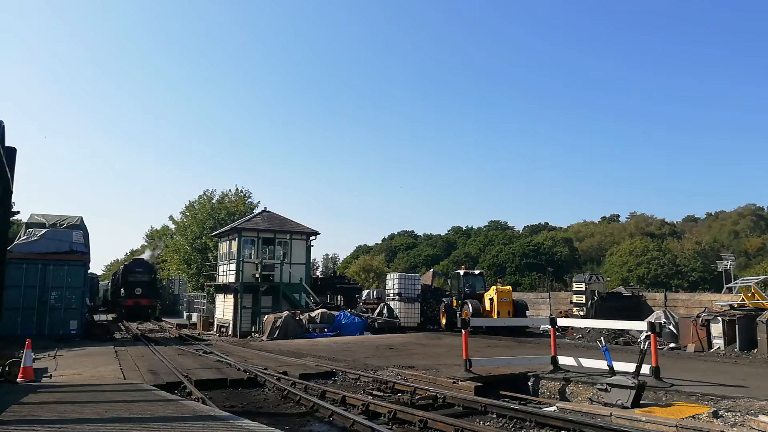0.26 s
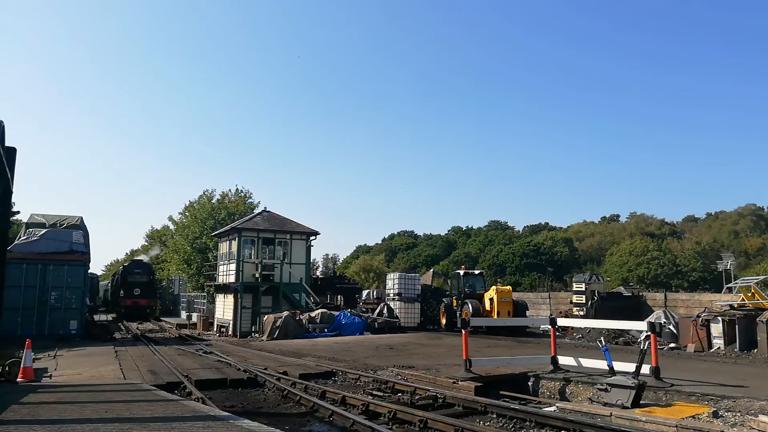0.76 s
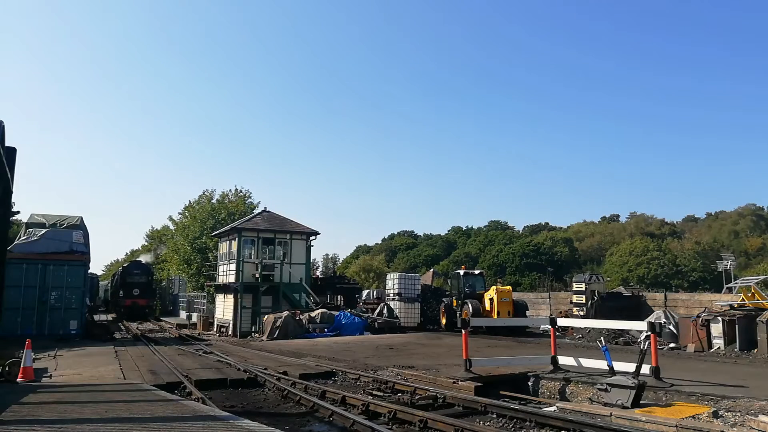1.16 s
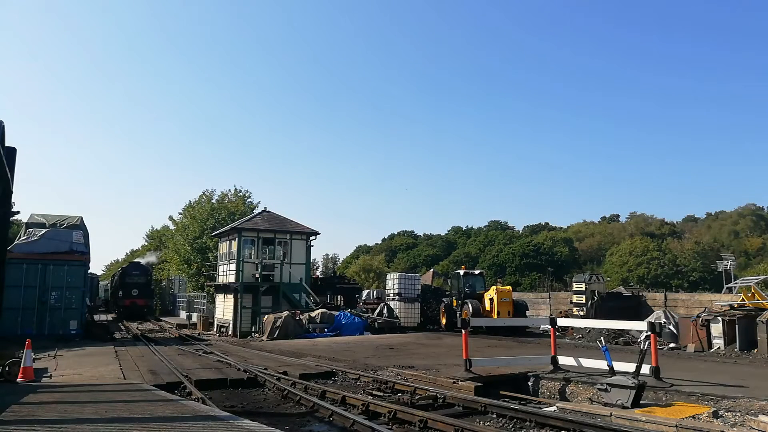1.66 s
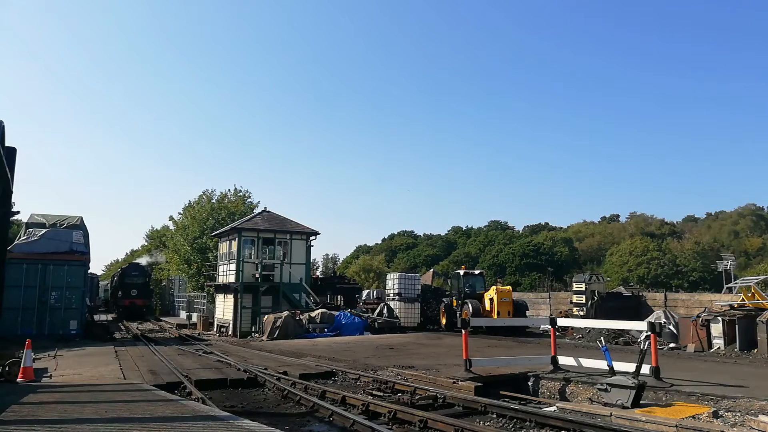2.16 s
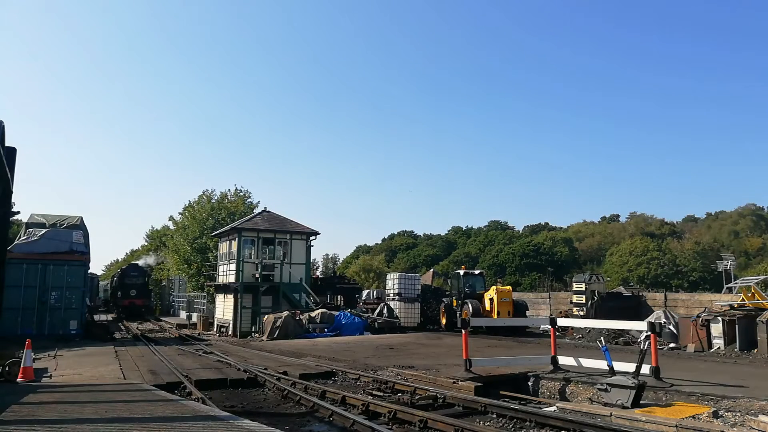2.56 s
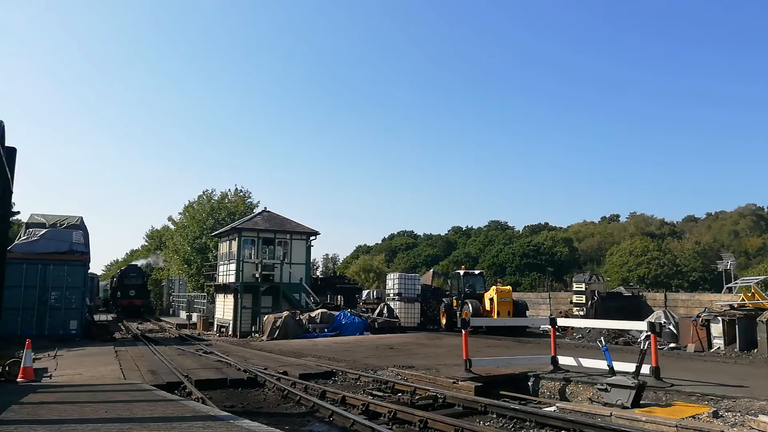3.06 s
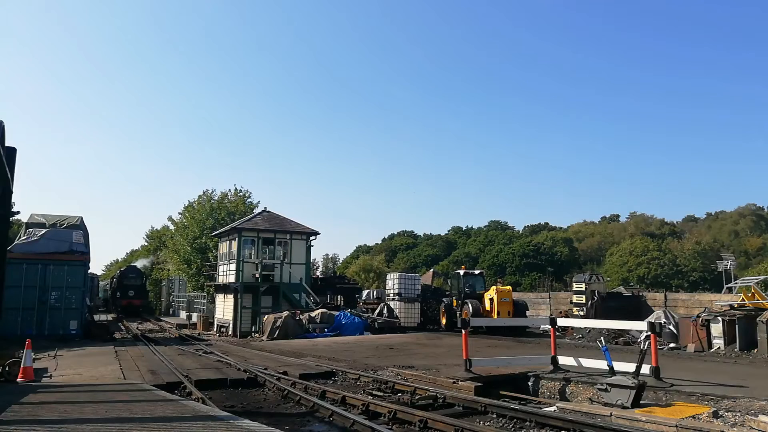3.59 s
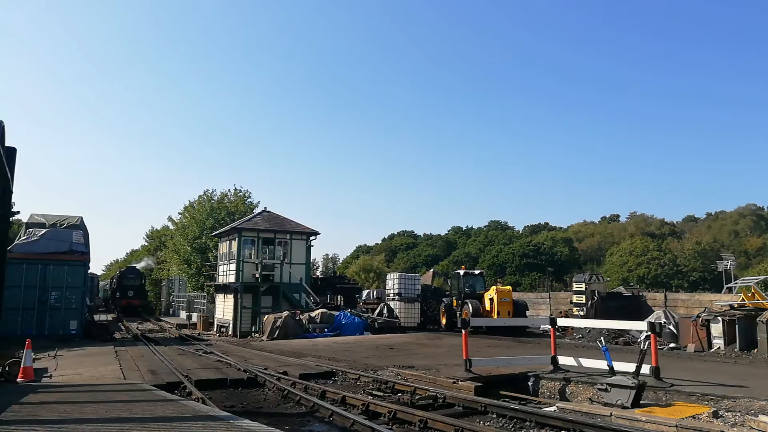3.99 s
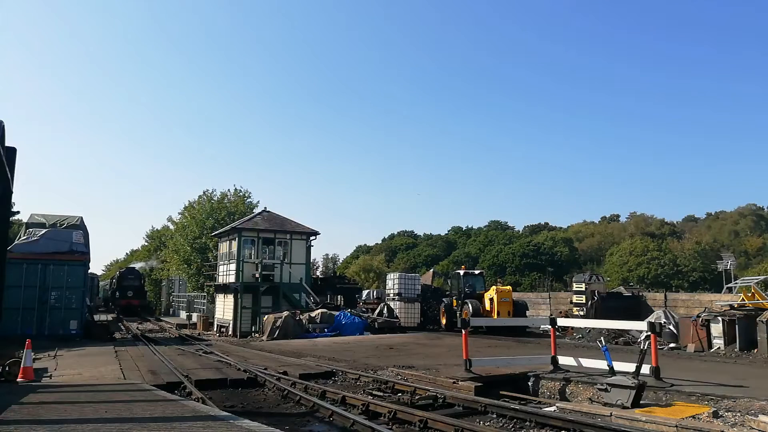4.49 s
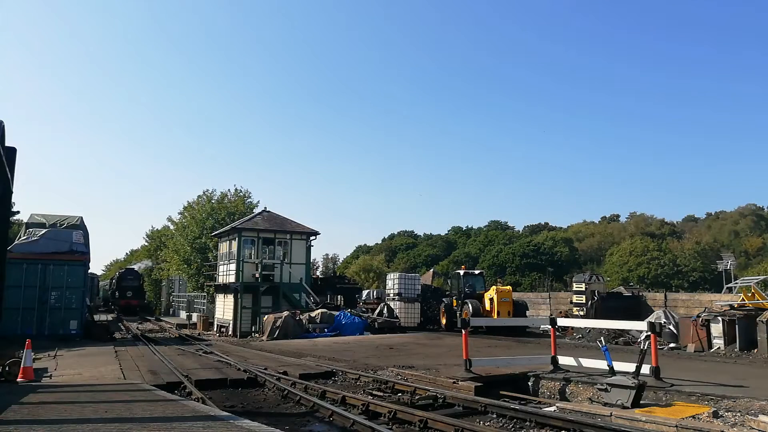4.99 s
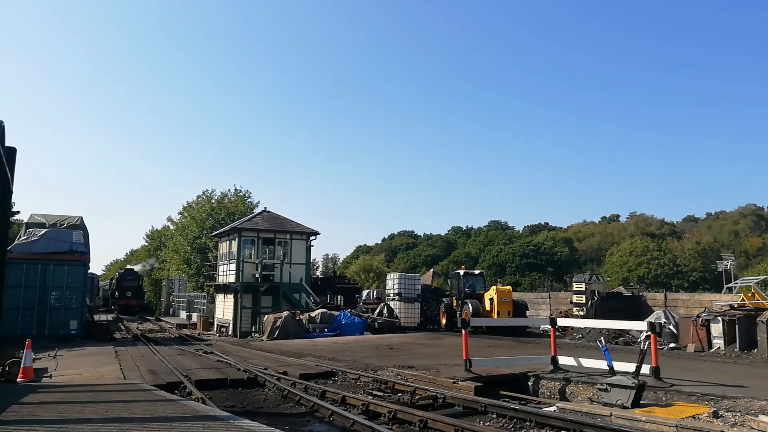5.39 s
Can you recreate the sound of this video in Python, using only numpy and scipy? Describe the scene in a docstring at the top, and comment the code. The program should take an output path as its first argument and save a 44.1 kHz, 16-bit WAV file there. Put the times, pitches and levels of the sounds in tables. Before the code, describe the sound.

Stereo outdoor pickup: steam swells and ebbs in five slow blasts, bright and airy, with a constant faint leak between them. Close to the right, a dry metal linkage scrapes over catches, ticks, clacks home and rebounds with tiny squeaks, five times. The second and fourth blasts squeal with breathy high tones. A low engine roar fades slightly as the locomotive departs, with a few soft wind bumps.

```python
"""An open yard: a steam locomotive draws slowly away, left of the listening point.
Shaped noise swells as steam from its cylinder cocks: a soft chuff, a jet and a thinner hiss;
it sputters most in the first blast, and wavering edge tones whistle in the two hardest.
Close on the right a metal linkage drags, clacks and squeaks: noise bursts, decaying modes and gliding tones.
Under it all lie low noise and a drone for the engine, and a little wind."""
import sys
import numpy as np
from scipy import signal
from scipy.fft import rfft, irfft
from scipy.io import wavfile
from scipy.ndimage import uniform_filter1d

SR = 44100
rng = np.random.default_rng(int(sys.argv[2]) if len(sys.argv) > 2 else 0)


def generate_wav(signal):
    """Clip the signal to [-1, 1] and save it as 16-bit WAV at the path in sys.argv[1]."""
    frames = np.transpose(np.atleast_2d(signal))
    scaled = np.clip(frames, -1, 1) * 32767
    pcm = np.round(scaled).astype(np.int16)
    wavfile.write(sys.argv[1], SR, pcm)


N = 248724
T = np.arange(N) / SR  # time [s]
HZ = np.fft.rfftfreq(N, 1 / SR)  # frequency axis [Hz]

# Relative power spectra of the sources: f/Hz, level/dB (per Hz)
RUMBLE_SPECTRUM = [(15, -2), (30, -8.5), (50, -2), (75, 0.5), (100, -2), (130, -4.5), (190, -7.5),
                   (300, -14), (400, -17), (500, -24.5), (900, -23), (2000, -77), (6000, -62), (15000, -45)]
THUD_SPECTRUM = [(80, -27), (200, 3), (320, 4), (450, -4), (700, -9), (1500, -22), (5000, -50)]
CHUFF_SPECTRUM = [(400, -15), (700, -5.5), (950, 5.5), (1250, 3), (1600, -0.5), (1950, 4), (2300, 4.5),
                  (3000, 1), (5000, -35)]
JET_SPECTRUM = [(500, -15), (1200, 4), (2700, 2), (3500, 2), (4500, 8), (5800, 3.5), (6600, 6.5),
                (8200, 6.5), (9600, 5), (10700, 1.5), (11700, -6), (13000, -9), (14200, -15), (16000, -88)]
THIN_HISS_SPECTRUM = [(1900, -23.5), (2500, -15.5), (3200, -5), (3700, -3.5), (4200, 0.5), (4650, -0.5),
                      (5100, -5.5), (5600, -7.5), (7000, -13.5), (9500, -36), (12000, -60)]
DRAG_SPECTRUM = [(600, -52), (1600, 1.5), (2450, -2), (2900, 9.5), (3250, -2), (3600, 5.5), (4400, 9),
                 (5800, 4.5), (7100, 7.5), (8200, -1.5), (10000, 10), (12500, -7), (15500, -14)]
CLACK_SPECTRUM = [(500, -7.5), (1400, -6.5), (2400, 0.5), (3100, 8), (3500, 0), (4250, 9.5), (5200, 3.5),
                  (6800, 1), (8200, 6), (9400, 11.5), (10800, 7), (12500, -3.5), (15500, -22)]
BED_SPECTRUM = [(150, -32), (330, -11), (480, -10.5), (640, 5), (850, -13), (1400, 1), (3000, -25)]
PUFF_SPECTRUM = [(70, -19), (140, -2), (200, -1.5), (280, -12), (420, -14.5), (1000, -48)]
# Rush of steam just under the highest edge tone: f/Hz, level/dB (per Hz)
RUSH_SPECTRUM = [(10000, -42), (11400, 9), (12300, 0), (13000, 9), (13550, -16), (14500, -53)]

# Likeness of the rumble at the two ports: f/Hz, likeness (0 to 1)
RUMBLE_LIKENESS = [(30, .96), (100, .97), (160, .92), (250, .7), (600, .3), (2000, .2)]
# Likeness of the steam at the two ports, limited to 0..1 in use: f/Hz, likeness
STEAM_LIKENESS = [(300, 0.3), (550, 0.3), (1000, 0.88), (1400, 0.46), (1750, 0.1), (2050, 0.62),
                  (2250, 0.65), (2700, 0.82), (3600, 0), (4500, 1.23), (5600, 0.33), (7000, 0.5),
                  (8600, 0.56), (10200, 0.05), (11500, 0.2)]
# Balance of the steam: f/Hz, left minus right level/dB
STEAM_BALANCE = [(500, -3.5), (950, 5), (1400, -2), (1750, -3.5), (2250, 2.5), (3250, 0), (3700, 4.5),
                 (4550, 2), (5000, -5.5), (5900, 0.5), (7000, 1.5), (9000, 0.5), (10600, 6.5), (12000, 4),
                 (15000, 2)]
# Phase turned by reflections: f/Hz, phase/rad by which the left port leads beyond LEAD_MS
PHASE_TURN = [(300, 0.48), (600, 2.2), (1000, 0.65), (1550, -1.02), (2000, 1.05), (2300, -0.099),
              (6300, -0.64), (7000, -0.33), (8500, -1), (10500, -0.41)]
# Depth scale of the slow random unevenness of the steam's spectrum: f/Hz, level/dB
UNEVEN_DEPTH = [(500, 2.2), (2500, 2.7), (5000, 1.9), (12000, 1.8)]

# Level of the engine's low drone: t/s, level/dB
DRONE_LEVEL = [(0, -48), (.7, -52), (1.5, -54.5), (2.1, -59), (2.9, -54), (3.7, -52), (4.3, -51.5),
               (5.63, -50.5)]
# Gusts on the microphone: t/s of the peak, half length/s, level/dB
GUSTS = [(1.348, 0.069, -35.5), (2.834, 0.016, -41), (4.376, 0.032, -46)]
# Soft low bumps: t/s, level/dB, length/s
BUMPS = [(4.812, -51.5, 0.028)]

# Blasts of the cylinder cocks, one per piston stroke: t/s at full pressure, half length/s,
# build/s, ebb/s, then level/dB of chuff, jet, thin hiss, jet's bright hump, low puff
BLASTS = [(0.553, 0.17, 0.25, 0.15, -42.5, -46, -39.5, 14, -54),
          (1.745, 0.16, 0.35, 0.16, -47, -35, -40, 8.5, -78),
          (2.988, 0.16, 0.21, 0.18, -47.5, -40.5, -42.5, 2, -52),
          (4.093, 0.15, 0.3, 0.28, -50, -35.5, -45.5, 8.5, -50),
          (5.273, 0.15, 0.18, 0.12, -46.5, -42.5, -46, -2.5, -62)]
# Relative level of the constantly present, slowly varying leak of steam: t/s, level/dB
LEAK_LEVEL = [(0, 7.5), (.3, 7.5), (.8, 6.5), (1.14, 3), (2.3, 2.5), (2.6, 6), (3.0, 1), (3.55, 2),
              (4.65, 2), (5.0, 5), (5.63, 1)]
# Thin hisses between and within the blasts: t/s at the top, build/s, ebb/s, hiss level/dB,
# broad jet level/dB, resonance f/Hz, its width/Hz, its level/dB, share by which its pitch sags at low pressure
HISSES = [(0.965, 0.12, 0.082, -41.5, -47.5, 4840, 720, -41, 0.13),
          (2.049, .125, 0.13, -38.5, -43.5, 4540, 700, -36.5, 0.029),
          (2.629, 0.1, 0.073, -60, -61, 4330, 550, -51, .03),
          (2.85, 0.076, 0.12, -53, -60, 4900, 800, -46, 0.092),
          (3.32, 0.105, 0.11, -44, -47, 5100, 560, -46.5, 0.11),
          (4.418, 0.077, 0.097, -48, -46, 4360, 700, -58, 0.045),
          (5.25, 0.14, .1, -60, -60, 4340, 480, -48, 0.035),
          (5.61, 0.09, 0.098, -50, -46, 5140, 780, -45.5, 0.11)]
# Depth of the sputter of wet steam, until the cylinders have cleared: t/s, level/dB
SPUTTER_DEPTH = [(.3, 1.2), (.42, 2.5), (.66, 2.5), (.78, 1.1)]
# Drops of water spat out with the steam: t/s, level/dB, length/s
SPITS = [(.4445, -39, .0012), (.4607, -31.5, .003), (.5652, -36, .0015), (.5695, -38, .002),
         (.659, -38, .001)]
# Hollow notes in the steam: t/s of the peak, half length/s, f/Hz, level/dB, left minus right level/dB
HOLLOW_NOTES = [(0.144, 0.53, 1930, -56, -35), (0.926, 0.054, 1940, -53, -24),
                (1.655, 0.25, 1852, -51.5, -16), (4.927, 0.15, 1993, -58.5, 15),
                (5.541, 0.19, 1924, -57.5, -3)]

# Catches that the linkage slips over as a stroke begins: t/s, level/dB, length/s, ring f/Hz
CATCHES = [(.1447, -31.5, .0045, 4250), (.1637, -27, .0038, 3550), (.1788, -34, .003, 3900),
           (1.1998, -32.5, .0045, 4250), (1.2182, -27, .004, 3550), (1.2332, -36, .003, 3900),
           (2.0322, -26.5, .003, 4250), (2.051, -30, .0045, 3550), (3.689, -31.5, .0045, 4250),
           (3.7076, -27, .0036, 3550), (3.7238, -35, .003, 3900), (5.3267, -26.5, .0045, 4250),
           (5.3452, -27.5, .004, 3550)]
# Ticks, clacks home and rebounds that follow: t/s, level/dB, length/s, ring f/Hz
CLACKS = [(.2207, -28.5, 0.0035, 9280), (.2712, -21.5, 0.0025, 4125), (.283, -23.5, 0.0027, 9300),
          (1.2753, -26.5, 0.0034, 9300), (1.3258, -23, 0.0052, 4360), (1.3368, -28.5, 0.0038, 9300),
          (2.1077, -28.5, .003, 9400), (2.1585, -24, 0.0039, 4350), (2.169, -25, 0.0027, 9200),
          (3.7638, -26, 0.0028, 8930), (3.8133, -26.5, 0.0092, 4160), (3.8254, -27, 0.0036, 9600),
          (5.4028, -24, 0.0021, 9400), (5.451, -24, 0.006, 4240), (5.4635, -32, 0.0063, 8900)]
# Strokes of the linkage: t/s of the main blow, then level/dB of rattle, scrape, squeak
STROKES = [(.2712, -50, -34, -44), (1.324, -28, -39, -41.5), (2.158, -32.5, -45, -43.5),
           (3.814, -30, -40, -42), (5.449, -28, -37, -39.5)]
# Squeaks in each stroke: t/s after the blow, length/s, start f/Hz, end f/Hz, relative level/dB
SQUEAKS = [(-.025, .027, 9950, 9900, 1.5), (.035, .028, 6780, 6420, 2)]

# Hardest blasts, which whistle: t/s at full pressure, half length/s, pitch factor, relative level/dB
WHISTLES = [(1.745, .185, 1.0, 1), (4.093, .18, 1.005, -2.5)]
# Edge tones of the cocks: f/Hz at full pressure before the pitch factor, length as a share of the blast,
# lag/s, share by which the pitch sags at the ends
EDGE_TONES = [(13130, 1.02, 0, .078), (8430, .82, .027, .066), (10480, .8, -.01, .03)]
# Strengths of the edge tones, in the same order: clean tone level/dB, breathy band level/dB,
# left minus right level/dB, share of the clean tone that frays away at full pressure
EDGE_LEVELS = [(-38.5, -45, 3, .65), (-36.3, -38, -1, .15), (-50, -47, 4, .3)]

LEAD_MS = .178  # steam reaches the left port first
LEAK_CHUFF_DB, LEAK_JET_DB, LEAK_HISS_DB = -60, -56, -63.5  # before LEAK_LEVEL is added
LEAK_BRIGHT_DB, DULLING_DB_PER_S = 5, 0.5  # the leak loses brightness as the engine draws away
HISS_LEAD_S = 0.052  # the thin hiss opens ahead of the jet
CHUFF_SWELL_DB, JET_SWELL_DB, HISS_SWELL_DB = -4.5, -6, -2  # build and ebb, relative to the blast
CHUFF_SPREAD = 1.28  # the chuff builds and ebbs this much more slowly than the jet
SPUTTER_HZ = 330
DRONE_HZ, DRONE_OCTAVE_DB = 94.5, -11
BREEZE_DB = -59
BED_DB, BED_LEAD_S, BED_HALF_S = -58, 0.0094, 0.093
PUFF_HALF_S = 0.081
RUSH_DB = -48.5  # before each whistle's relative level
EDGE_HZ = 15900


def gain_of(db):
    """Definition of level: decibels to amplitude."""
    return 10 ** (np.asarray(db) / 20)


def evened(x):
    """Normalization: scales a signal to rms 1."""
    return x / np.sqrt(np.mean(x ** 2) + 1e-20)


def read(points, hz):
    """Interpolation: a frequency table joined on a logarithmic axis."""
    f, value = np.transpose(points)
    return np.interp(np.log(hz + 1), np.log(f + 1), value)


def wander(rate_hz):
    """Random modulation: low-passed noise of rms 1, up to the given rate."""
    return evened(irfft(rfft(rng.standard_normal(N)) / (1 + (HZ / rate_hz) ** 4), N))


def swell(s, half_s, steepness=2):
    """Envelope of height 1 around s; a higher steepness gives a flatter top and quicker edges."""
    return np.exp(-np.minimum(abs((T - s) / half_s) ** steepness, 60))


def bursts(rows, tail_db, tail_s, rise_s=.0003):
    """Transient power: a sudden crack and an exponentially dying tail."""
    power = np.zeros(N)
    for s, db, length, *_ in rows:
        t = np.maximum(T - s, 0)
        crack = swell(s, length) + gain_of(tail_db) ** 2 * np.exp(-t / tail_s)
        onset = (1 - swell(s, rise_s)) * (t > 0)
        power += gain_of(db) ** 2 * crack * onset
    return power


def ports(shape_db, same, lead_ms, balance_db):
    """Partial coherence: spectra of noise at two ports, partly alike, the left earlier by lead_ms."""
    a, b = rfft(rng.standard_normal((2, N)))
    same = np.clip(same, -1, 1)
    lead = np.exp(2j * np.pi * HZ * lead_ms / 10 ** 3)
    left = (same * a + np.sqrt(1 - same ** 2) * b) * lead
    pair = np.array([left * gain_of(balance_db / 2), a * gain_of(-balance_db / 2)])
    return pair * gain_of(shape_db)


def far_noise(shape_db, likeness=1.0):
    """Direct and scattered field: noise from the direction of the locomotive."""
    direct, scattered = rfft(rng.standard_normal((2, N)))
    same = np.clip(likeness * read(STEAM_LIKENESS, HZ), 0, 1)
    balance_db = read(STEAM_BALANCE, HZ)
    lead = np.exp(1j * (2 * np.pi * HZ * LEAD_MS / 10 ** 3 + read(PHASE_TURN, HZ)))
    left = (same * direct + np.sqrt(1 - same ** 2) * scattered) * lead
    sides_db = [shape_db + balance_db / 2, shape_db - balance_db / 2]
    return evened(irfft(np.array([left, direct]) * gain_of(sides_db), N))


def near_noise(spectrum, balance_db):
    """Near field: noise from close on the right, its spectrum made randomly uneven."""
    knots = np.linspace(0, SR / 2, num=200)
    uneven_db = 1.3 * np.interp(HZ, knots, rng.standard_normal(size=200))
    return evened(irfft(ports(read(spectrum, HZ) + uneven_db, 0.064, -0.24, balance_db), N))


def band(hz, width_hz, size=N):
    """Resonance: complex noise in a band that follows the pitch hz, of unit deviation."""
    r = np.exp(-np.pi * abs(width_hz) / SR)
    white = rng.standard_normal(size) + 1j * rng.standard_normal(size)
    fuzz = signal.lfilter([1], [1, -2 * r, r * r], white)
    return fuzz / np.std(fuzz) * np.exp(2j * np.pi * np.cumsum(hz) / SR)


def far_band(hz, width_hz, scatter=1.0):
    """Time difference: a narrow band leading at the left port, with scattered sound at each port."""
    direct, left, right = (band(hz, width_hz, size=len(hz)) for _ in range(3))
    lead = np.exp(2j * np.pi * hz * LEAD_MS / 10 ** 3)
    return evened(np.array([direct * lead + scatter * left, direct + scatter * right]).real)


def soft_note(power, hz, width_hz):
    """Resonant flow noise: a narrow band that follows a power curve and a pitch."""
    out, on = np.zeros((2, N)), power > 1e-4
    out[:, on] = far_band(np.broadcast_to(hz, N)[on], width_hz) * np.sqrt(power[on])
    return out


def drone(waver_hz=5.0, waver_rate_hz=12):
    """Harmonic sound: the engine's low drone and its octave, wavering in pitch and level."""
    phase = 2 * np.pi * np.cumsum(DRONE_HZ + waver_hz * wander(waver_rate_hz)) / SR
    level_db = np.interp(T, *np.transpose(DRONE_LEVEL)) + 1.65 * wander(6.9)
    tone = np.sin(phase) + gain_of(DRONE_OCTAVE_DB) * np.sin(2 * phase)
    return evened(tone) * gain_of(level_db)


def rumble(rumble_db=-46.0, recede_db=0.88, wind_hz=70):
    """Low-frequency noise: a roar fading by recede_db a second, the drone, a soft bump and lumps of wind."""
    roar = evened(irfft(ports(read(RUMBLE_SPECTRUM, HZ), read(RUMBLE_LIKENESS, HZ), .04, 0), N))
    roar *= gain_of(rumble_db - recede_db * T + 1.3 * wander(7))
    wind_shape = HZ ** 2 / (HZ ** 2 + 26 ** 2) / (1 + (HZ / wind_hz) ** 3)
    wind = evened(irfft(ports(0, 1.0, 0, 0) * wind_shape, N))
    gusts = sum(gain_of(db) * np.sqrt(swell(s, half, steepness=1.43)) for s, half, db in GUSTS)
    bump = far_noise(read(THUD_SPECTRUM, HZ)) * np.sqrt(bursts(BUMPS, tail_db=0, tail_s=0.017))
    return roar + drone() + wind * (gain_of(BREEZE_DB) + gusts) + bump


def blast_power(s, half_s, swell_db, build_s, ebb_s, steepness, swell_steepness=4.9):
    """Valve flow: power of an open-valve plateau on a slow build and ebb."""
    surround = gain_of(swell_db) ** 2 * swell(s, np.where(T < s, build_s, ebb_s), swell_steepness)
    return np.maximum(swell(s, half_s, steepness), surround)


def steam_levels(chuff_steepness=2.5, jet_steepness=5.2, hiss_steepness=3.5,
                 blast_note_hz=4550, blast_note_db=-11):
    """Addition of powers: amplitudes of chuff, jet and thin hiss, jet brightness, and the hiss's note."""
    leak_db = np.interp(T, *np.transpose(LEAK_LEVEL))
    chuff, jet, hiss = (gain_of(db + leak_db) ** 2 for db in (LEAK_CHUFF_DB, LEAK_JET_DB, LEAK_HISS_DB))
    bright_db = rest_db = LEAK_BRIGHT_DB - DULLING_DB_PER_S * T
    for s, half, build, ebb, chuff_db, jet_db, hiss_db, brightness_db, _ in BLASTS:
        chuff += gain_of(chuff_db) ** 2 * blast_power(
            s, half, CHUFF_SWELL_DB, CHUFF_SPREAD * build, CHUFF_SPREAD * ebb, chuff_steepness)
        jet += gain_of(jet_db) ** 2 * blast_power(s, half, JET_SWELL_DB, build, ebb, jet_steepness)
        hiss += gain_of(hiss_db) ** 2 * blast_power(
            s - HISS_LEAD_S, half, HISS_SWELL_DB, build, ebb, hiss_steepness)
        bright_db = bright_db + (brightness_db - rest_db) * swell(s, half, steepness=4.9)
    blast_note = far_band(np.full(N, blast_note_hz), width_hz=920)
    note = blast_note * np.sqrt(hiss) * gain_of(blast_note_db)
    for s, build_s, ebb_s, hiss_db, jet_db, note_hz, width_hz, note_db, sag in HISSES:
        side_s = np.where(T < s, build_s, ebb_s)
        power = swell(s, side_s, hiss_steepness)
        hiss += gain_of(hiss_db) ** 2 * power
        jet += gain_of(jet_db) ** 2 * power
        pressure = swell(s, side_s)
        note += soft_note(power, note_hz * (1 - sag * (1 - pressure)), width_hz) * gain_of(note_db)
    return np.sqrt(chuff), np.sqrt(jet), np.sqrt(hiss), bright_db, note


def sputter():
    """Amplitude modulation: quick uneven gain of wet steam, of mean power 1."""
    depth = np.log(gain_of(np.interp(T, *np.transpose(SPUTTER_DEPTH))))
    return np.exp(depth * wander(SPUTTER_HZ) - depth ** 2)


def steam(bright_hz=9900, bright_width_hz=1200, flutter_db=0.5, chuff_flutter_db=1.87):
    """Jet noise: chuff, jet and thin hiss swell, sputter and spit; a bright hump in the jet varies."""
    chuff, jet, hiss, bright_db, note = steam_levels()
    flutter = gain_of(flutter_db * wander(32.0)) * sputter()
    blow = far_noise(read(JET_SPECTRUM, HZ))
    hump = irfft(rfft(blow) * np.exp(-((HZ - bright_hz) / bright_width_hz) ** 2 / 2), N)
    bright_jet = (blow + hump * (gain_of(bright_db) - 1)) * jet
    thin_hiss = far_noise(read(THIN_HISS_SPECTRUM, HZ), likeness=0.99) * hiss
    spits = far_noise(read(JET_SPECTRUM, HZ)) * np.sqrt(bursts(SPITS, tail_db=-14, tail_s=.005))
    soft_chuff = far_noise(read(CHUFF_SPECTRUM, HZ)) * chuff * gain_of(chuff_flutter_db * wander(10.5))
    return (bright_jet + note + thin_hiss) * flutter + spits + soft_chuff


def uneven_spectrum(x):
    """Spectral modulation: slow random unevenness of the steam's spectrum, partly shared by the ports."""
    hz, _, z = signal.stft(x, SR, nperseg=1024, noverlap=768)
    # two port patterns and a shared one, smoothed over frequency, then over time
    drift = uniform_filter1d(rng.standard_normal((3,) + z.shape[1:]), size=3, axis=1)
    drift = drift - uniform_filter1d(drift, size=9, axis=1)
    drift = evened(uniform_filter1d(drift, size=70, axis=2))
    depth_db = read(UNEVEN_DEPTH, hz)[:, None]
    uneven_db = depth_db * (drift[2] + .5 * drift[:2]) - depth_db ** 2 / 7  # last term offsets the mean power
    return signal.istft(z * gain_of(uneven_db), SR, nperseg=1024, noverlap=768)[1][:, :N]


def hollow():
    """Narrow-band resonance: a faint pipe-like note comes and goes under the hiss."""
    out = np.zeros((2, N))
    for s, half, hz, db, pan_db in HOLLOW_NOTES:
        sides_db = db + np.array([[pan_db], [-pan_db]]) / 2 - abs(pan_db) / 4
        out += soft_note(swell(s, half), hz, width_hz=280) * gain_of(sides_db)
    return out


def rings(rows, ring_db, t60_s, rise_s=0.0011):
    """Modal decay: each impact leaves one mode ringing briefly, mostly on the right."""
    out, t = np.zeros(N), np.arange(SR // 10) / SR
    for s, db, _, hz in rows:
        envelope = gain_of(db + ring_db - 60 * t / t60_s) * (1 - np.exp(-t / rise_s))
        out[round(s * SR):][:len(t)] += envelope * np.sin(2 * np.pi * hz * t)
    return out * gain_of([[-6], [3]])


def linkage(slide_db=-44.5, rattle_s=0.01, scrape_s=0.0089, grain_db=0.5):
    """Friction and impact: each stroke scrapes over its catches, ticks, clacks home, rebounds, rattles."""
    clack = bursts(CLACKS, tail_db=-14, tail_s=.007)
    drag = bursts(CATCHES, tail_db=-11, tail_s=.007)
    for s, rattle_db, scrape_db, _ in STROKES:
        since_rebound = T - s - .014
        rattle = (since_rebound > 0) * np.exp(-abs(since_rebound) / rattle_s)
        clack += gain_of(rattle_db) ** 2 * rattle
        drag += gain_of(scrape_db) ** 2 * swell(s - .111, scrape_s)
        drag += gain_of(slide_db) ** 2 * swell(s - 0.04, 0.11, steepness=20)  # faint sliding all through
    grain = evened(gain_of(grain_db * wander(1600)))  # rough faces touch in many tiny impacts
    clacking = near_noise(CLACK_SPECTRUM, balance_db=-10.0) * np.sqrt(clack)
    dragging = near_noise(DRAG_SPECTRUM, balance_db=-7.0) * np.sqrt(drag)
    ringing = rings(CATCHES, ring_db=-5.0, t60_s=0.059) + rings(CLACKS, ring_db=-1.5, t60_s=0.027)
    return grain * (clacking + dragging) + ringing


def bed():
    """Structure-borne sound: a dull hum from whatever carries the linkage, while each stroke moves."""
    moving = sum(swell(s - BED_LEAD_S, BED_HALF_S, steepness=11) for s, *_ in STROKES)
    return near_noise(BED_SPECTRUM, balance_db=-6.5) * gain_of(BED_DB) * np.sqrt(moving)


def squeaks():
    """Dry friction: metal gives a short falling tone before and after each main blow."""
    out = np.zeros(N)
    waver = 1 + .009 * wander(400)
    for s, *_, db in STROKES:
        for after, length, start_hz, end_hz, part_db in SQUEAKS:
            u = (T - s - after) / length  # 0 to 1 through the squeak
            on = (u > 0) & (u < 1)
            hz = (start_hz + (end_hz - start_hz) * u[on]) * waver[on]
            tone = np.sin(2 * np.pi * np.cumsum(hz) / SR)
            out[on] += gain_of(db + part_db) * np.sin(np.pi * u[on]) * tone
    return out * gain_of([[-5], [3]])


def puffs():
    """Low-frequency flow pulse: a soft puff at the height of each blast."""
    power = sum(gain_of(db) ** 2 * swell(s, PUFF_HALF_S) for s, *_, db in BLASTS)
    return evened(irfft(ports(read(PUFF_SPECTRUM, HZ), 1.0, .04, 0), N)) * np.sqrt(power)


def whistles(jitter=0.0025, shiver_hz=80):
    """Edge tones: pitch rises and falls with blast pressure; tones waver and fray into a rush at its height."""
    rush_power = sum(gain_of(db) ** 2 * swell(s, half, steepness=5) for s, half, _, db in WHISTLES)
    out = far_noise(read(RUSH_SPECTRUM, HZ)) * gain_of(RUSH_DB) * np.sqrt(rush_power)
    for s, half, pitch, db in WHISTLES:
        for edge_tone, edge_level in zip(EDGE_TONES, EDGE_LEVELS):
            top_hz, share, lag, sag = edge_tone
            tone_db, breathy_db, pan_db, fray = edge_level
            on = abs(T - s - lag) < share * half
            u = (T[on] - s - lag) / half / share  # -1 to 1 through the tone
            hz = top_hz * pitch * (1 - sag * u ** 2 + jitter * wander(45)[on])
            pressure = np.exp(-3 * u ** 2)
            turns = np.cumsum(hz + shiver_hz * wander(500)[on]) / SR
            cycles = np.array([turns + hz * LEAD_MS / 10 ** 3, turns])
            direct = evened(np.sin(2 * np.pi * cycles + np.outer([1, 0], read(PHASE_TURN, hz))))
            fuzzy = direct + .45 * far_band(hz, width_hz=150)
            tone = fuzzy * gain_of(tone_db + 1.2 * wander(25)[on])
            breathy = far_band(hz, width_hz=520) * gain_of(breathy_db)
            mix = tone * (1 - fray * pressure) + breathy * np.sqrt(pressure)
            sides = gain_of([[pan_db / 2], [-pan_db / 2]])
            out[:, on] += gain_of(db) * sides * mix * signal.windows.tukey(len(u), .3)
    return out


def scene():
    """Superposition: locomotive, linkage and low background together."""
    engine = rumble() + uneven_spectrum(steam()) + hollow() + puffs() + whistles()
    return engine + linkage() + bed() + squeaks()


def record(dry):
    """Band limitation: the recorder's low-pass filter at EDGE_HZ."""
    low_pass = signal.firwin(511, EDGE_HZ, window=("kaiser", 9), fs=SR)
    return signal.oaconvolve(dry, low_pass[None], "same")


dry = scene()
out = record(dry)
generate_wav(out)
```